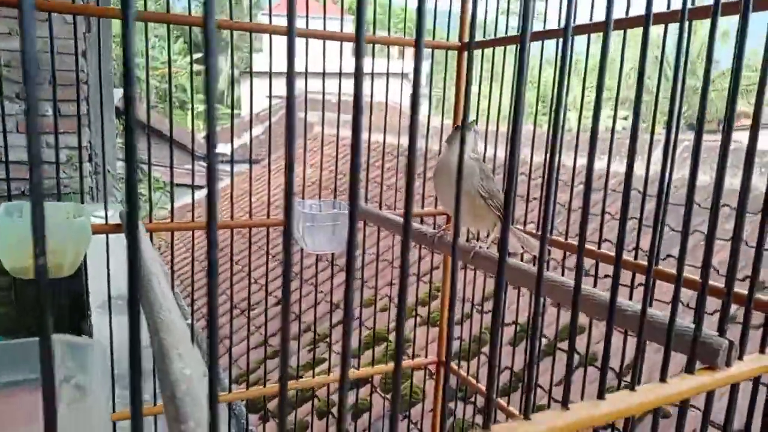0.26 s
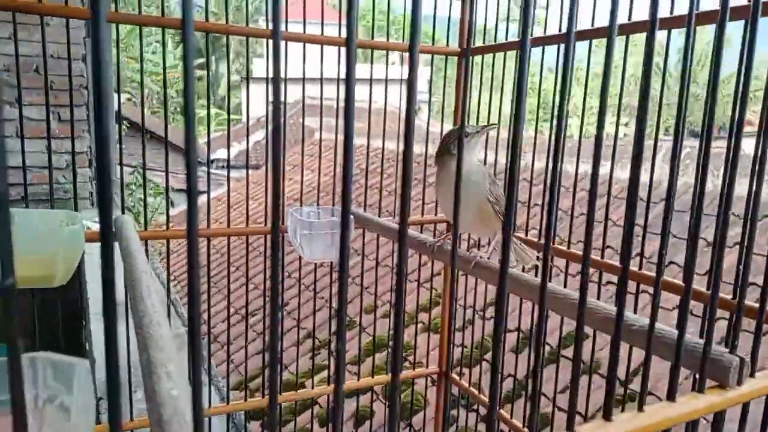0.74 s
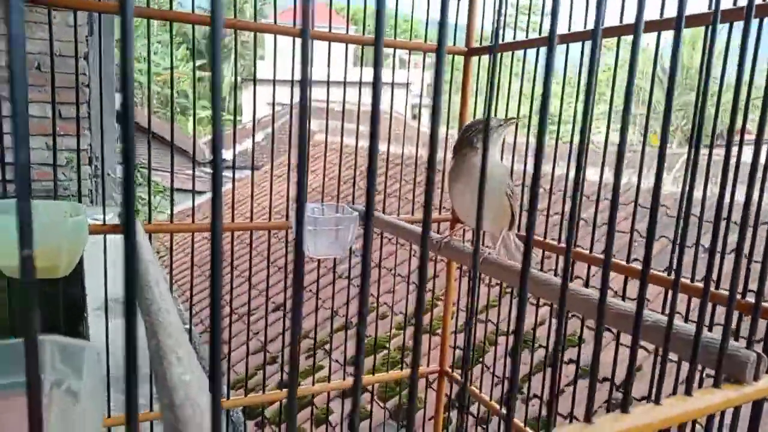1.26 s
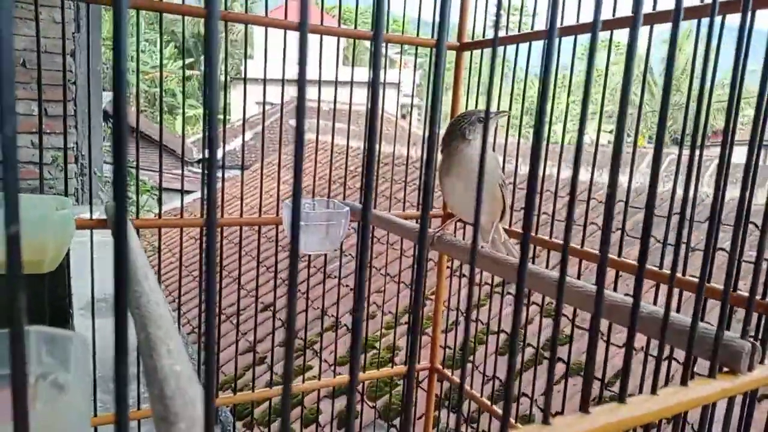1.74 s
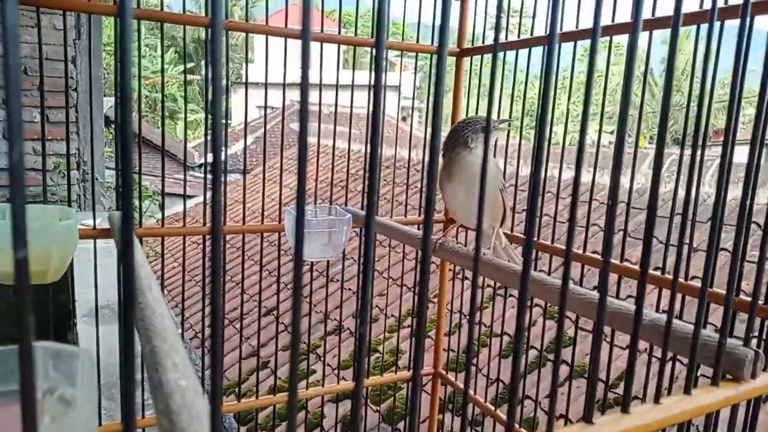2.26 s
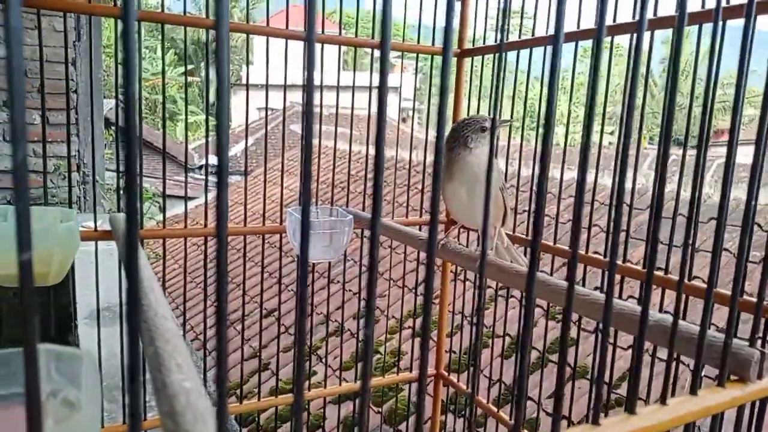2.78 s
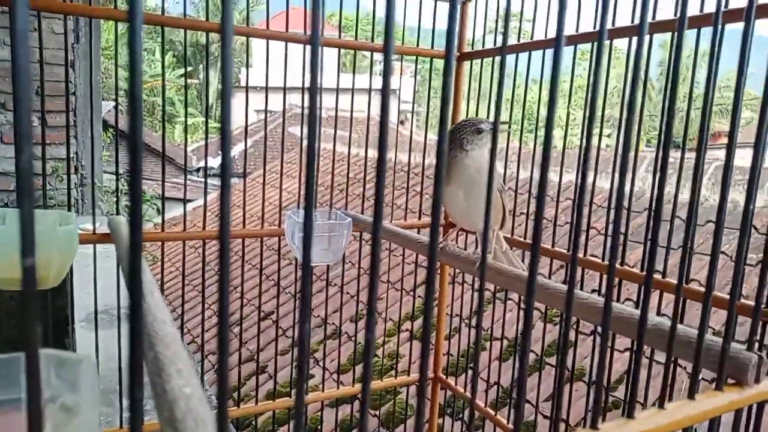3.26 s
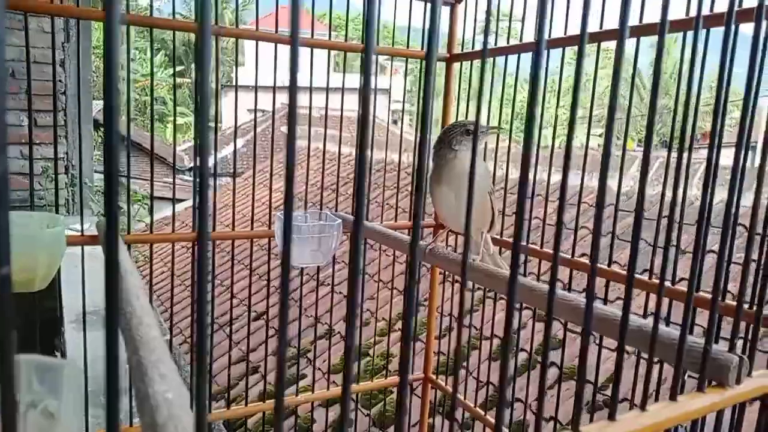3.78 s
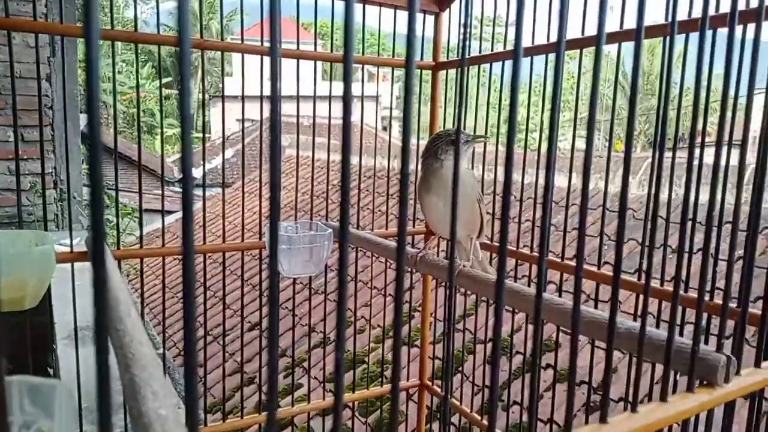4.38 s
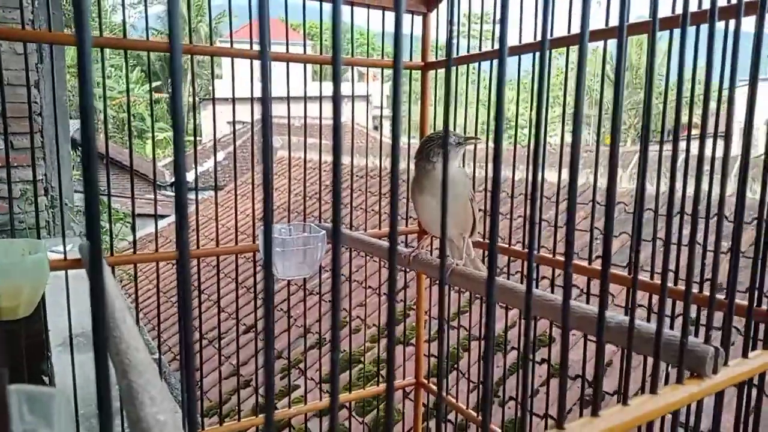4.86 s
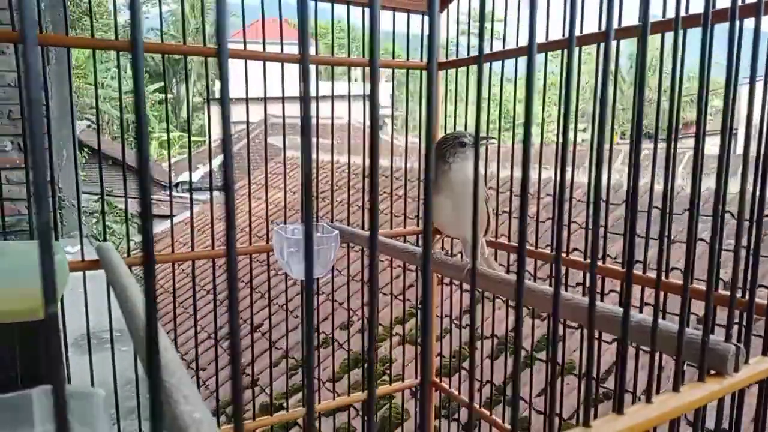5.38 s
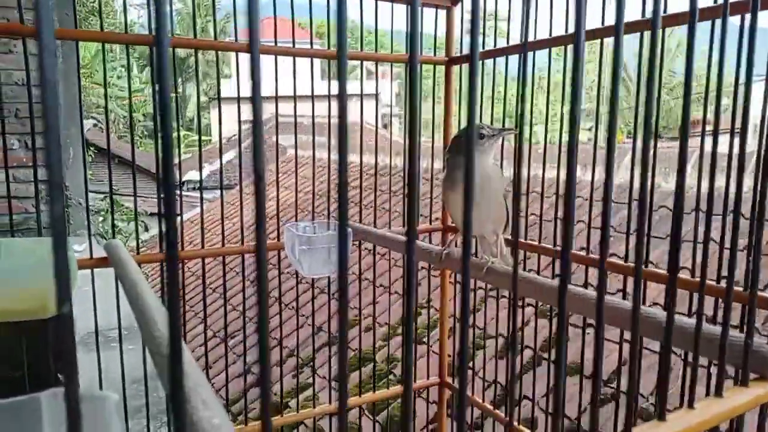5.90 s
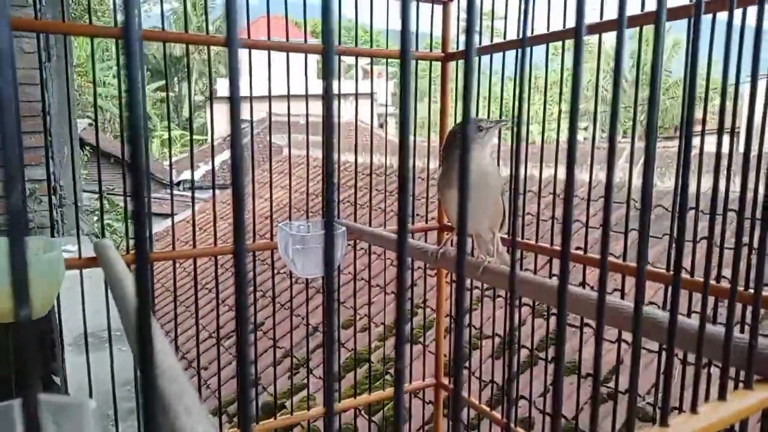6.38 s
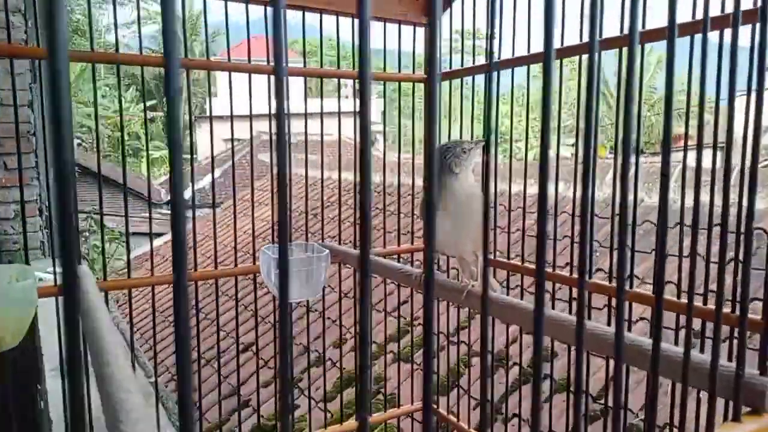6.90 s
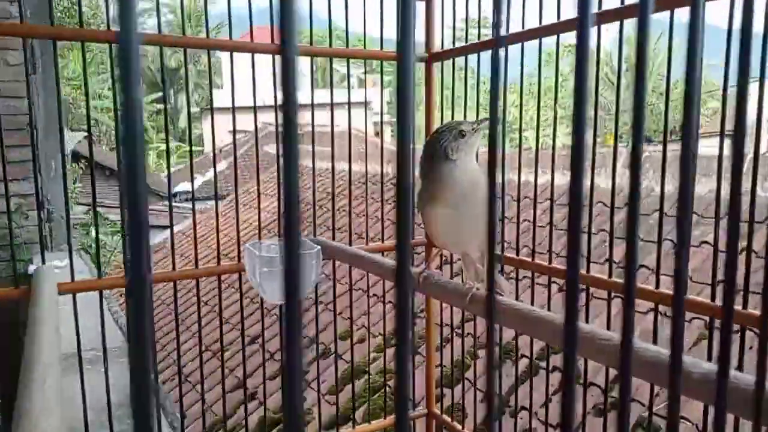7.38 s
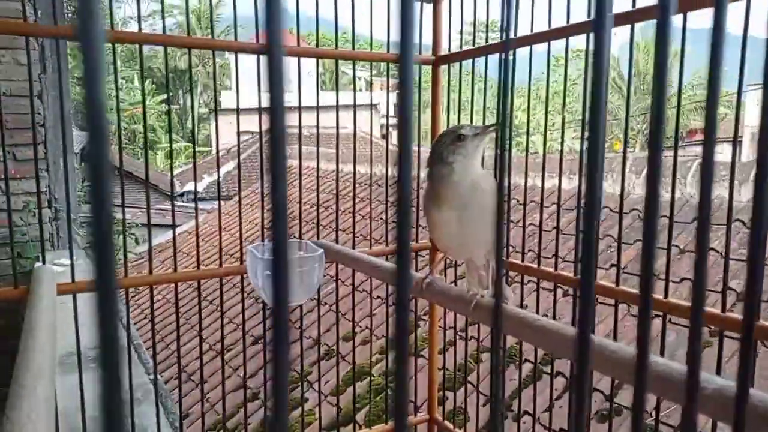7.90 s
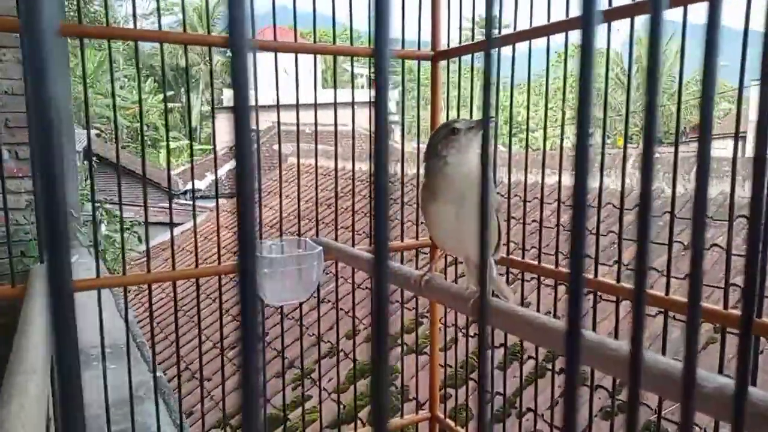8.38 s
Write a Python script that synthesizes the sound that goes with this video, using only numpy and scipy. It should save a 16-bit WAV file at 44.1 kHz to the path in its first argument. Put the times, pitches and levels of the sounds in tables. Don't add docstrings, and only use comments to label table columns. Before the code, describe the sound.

A small caged bird trills loudly and continuously close to the microphone, ten crisp falling whistles a second. The pitch sinks, jumps to a fuller high phrase midway, then gradually drops to deep-swooping notes, loudest near the end. Tiny claw ticks ring the bars around the middle. Behind lie faint engine drone, traffic wash, gusty rumble and hum, outdoors with short echoes off tiles and walls.

```python
import sys
import numpy as np
from scipy import signal
from scipy.fft import rfft, irfft
from scipy.io import wavfile

SR = 44100
rng = np.random.default_rng(int(sys.argv[2]) if len(sys.argv) > 2 else 0)


def level_to_linear(level):
    exponent = np.asarray(level, float) / 20
    return 10 ** exponent


def to_wav(sig):
    pcm = np.clip(np.atleast_2d(sig), -1, 1) * 32767
    pcm = np.round(pcm).astype(np.int16)
    wavfile.write(sys.argv[1], SR, pcm.T)


N = 381465
LEAD = SR // 10

# time in seconds, firing rate in Hz, level in dB.
LEAVING_ENGINE = [
    (0, 60, -36.5),
    (.8, 58.44, -36.5),
    (1.6, 57.97, -39.5),
    (2.4, 58, -63),
]


def at_hz(points, hz):
    points_hz, points_db = np.transpose(points)
    return np.interp(np.log(hz), np.log(points_hz), points_db)


def in_time(rows):
    s, *columns = np.transpose(rows)
    return [np.interp(np.arange(N) / SR, s, column) for column in columns]


def rms_one(x):
    return x / np.sqrt(np.mean(x ** 2) + 1e-20)


def band_pass(x, order, low_hz, high_hz):
    return signal.sosfilt(signal.butter(order, [low_hz, high_hz], "band", fs=SR, output="sos"), x)


def drift(rate):
    r = np.exp(-80 * np.pi * rate / SR)
    slow = signal.lfilter([1], [1, -2 * r, r * r], rng.standard_normal(N // 40 + 2002))[2000:]
    return np.interp(np.arange(N) / 40, np.arange(len(slow)), rms_one(slow))


def banded_noise(spectrum, low_hz, high_hz, patchy_db):
    out = 0
    together = drift(0.53)
    white = rng.standard_normal((2, N))
    edges = np.geomspace(low_hz, high_hz, 15)
    for k, (low, high) in enumerate(zip(edges, edges[1:])):
        band = band_pass(white[k % 2], 2, low, high)
        flicker_db = patchy_db * (.3 * together + drift(6))
        out = out + band * level_to_linear(at_hz(spectrum, np.sqrt(low * high)) + flicker_db)
    return rms_one(out)


def rumble():
    # frequency in Hz, density in dB per Hz.
    deep_spectrum = [(15, -54), (25, -27), (85, -1), (130, -18), (155, 12.5), (194, -0.5), (253, -30.5),
                     (358, -7), (454, -25), (552, -46), (700, -49), (910, -56), (1540, -120)]
    # centre in seconds, length in seconds, gain in dB.
    gusts = [
        (.5, 0.85, 4),
        (2.5, 1, 1.5),
        (3.9, 0.35, 4.5),
        (5.3, 0.37, 5.5),
        (6.665, 0.56, 2),
        (8.606, 0.41, 5.5),
    ]
    t = np.arange(N) / SR
    gust_db = sum(db * np.exp(-((t - s) / length_s) ** 2) for s, length_s, db in gusts)
    return level_to_linear(-42 + gust_db + 3 * drift(0.88)) * banded_noise(deep_spectrum, 26.2, 689.4, patchy_db=-2.0)


def traffic_wash():
    # frequency in Hz, density in dB per Hz.
    wash_spectrum = [(250, -9), (330, 2), (450, -5.5), (700, -7.5), (1100, -9.5), (2000, -6), (2500, -5),
                     (3300, -16), (4500, -35), (7300, -22), (8500, -27), (10000, -30), (12000, -46),
                     (17000, -42)]
    # time in seconds, level in dB.
    swell = [
        (0.0, -37),
        (0.6, -41),
        (2.0, -47),
        (3.4, -47.5),
        (4.2, -42),
        (5.3, -43),
        (6.3, -49),
        (7.4, -48.5),
        (8.65, -46.5),
    ]
    wash_db, = in_time(swell)
    return level_to_linear(wash_db + 1.0) * banded_noise(wash_spectrum, 276, 16660, patchy_db=2.74)


def engine(rows, orders, rough):
    hz, db = in_time(rows)
    phase = 2 * np.pi * np.cumsum(hz * (1 + rough * drift(2.09))) / SR
    sound = 0
    for k, level_db in orders:
        wavering = level_to_linear(level_db + 4.0 * drift(2.85))
        sound = sound + wavering * np.sin(round(k) * phase + rng.uniform(0, 2 * np.pi))
    t = np.arange(N) / SR
    passing = np.clip(np.minimum(t - rows[0][0], rows[-1][0] - t) * 8 + 1, 0, 1)
    return level_to_linear(db) * passing * rms_one(sound)


def far_engines():
    # time in seconds, firing rate in Hz, level in dB.
    slow_engine = [
        (0, 38.25, -54),
        (.5, 38.95, -40),
        (1.2, 38.27, -52),
        (1.9, 37.4, -51),
    ]
    passing_engine = [
        (3.3, 30.87, -53),
        (3.6, 30.59, -37),
        (4.5, 31.4, -42.5),
        (5.4, 31.74, -35),
        (5.75, 32.07, -44),
        (7.2, 33.5, -51),
        (7.6, 33.44, -49.5),
    ]
    # multiple of the firing rate, level in dB.
    leaving_orders = [(1, -29), (2, -0.5), (3, -0.5), (4, -7), (5, -6.5), (6, -3), (7, -21.5), (8, -13),
                      (9, -16), (11, -15), (13, -20.5), (15, -21)]
    slow_orders = [(2, 4.5), (4, -10), (8, 4), (9, -15), (11, -31), (12, -12)]
    passing_orders = [(2, -9.5), (4, 5), (5, -15), (6, 2.5), (7, -18.5), (8, -3.5), (9, -10), (10, -8.5),
                      (11, -7.5), (15, -25.5), (30, -15.5)]
    leaving = engine(LEAVING_ENGINE, leaving_orders, rough=0.0027)
    slow = engine(slow_engine, slow_orders, rough=0.0017)
    return leaving + slow + engine(passing_engine, passing_orders, rough=0.0031)


def tyres():
    # frequency in Hz, width in Hz, level in dB.
    tyre_modes = [
        (1541, 51, -50),
        (2092, 89, -45.5),
        (1863, 31, -52),
    ]
    out = 0
    fade_db = in_time(LEAVING_ENGINE)[1] - LEAVING_ENGINE[0][2]
    for hz, width_hz, db in tyre_modes:
        b, a = signal.iirpeak(hz, hz / width_hz, fs=SR)
        whine = rms_one(signal.lfilter(b, a, rng.standard_normal(N)))
        out = out + level_to_linear(db + 1.6 * fade_db) * whine
    return out


def hum():
    beating_db = 4.5 * np.tanh(drift(4))
    hz = 147.7 * (1 + 0.014 * drift(10.5))
    return level_to_linear(-45.5 + beating_db) * np.sin(2 * np.pi * np.cumsum(hz) / SR)


def whistles(calls):
    out = np.zeros(N)
    for s, length_s, from_hz, to_hz, db in calls:
        along = np.linspace(0, 1, round(length_s * SR))
        phase = 2 * np.pi * np.cumsum(from_hz + (to_hz - from_hz) * along) / SR
        swell = np.sqrt(np.abs(np.sin(np.pi * along)))
        out[round(s * SR):][:len(along)] += level_to_linear(db) * swell * np.sin(phase)
    return out


def insect():
    # start in seconds, length in seconds, from Hz, to Hz, level in dB.
    whines = [
        (.4, .09, 14400, 15500, -66),
        (.46, .08, 14800, 14100, -68),
        (.5, .105, 15500, 14700, -59),
        (.605, .05, 14700, 15600, -58),
        (.655, 0.034, 15760, 14600, -62),
        (.75, .055, 15000, 14550, -61),
        (.805, .04, 14550, 15400, -64),
        (1.165, .03, 15500, 14400, -64),
        (1.205, .012, 15400, 14400, -66),
    ]
    return whistles(whines)


def far_birds():
    # start in seconds, length in seconds, from Hz, to Hz, level in dB.
    pipes = [
        (2.89, 0.064, 3450, 3500, -36),
        (3.03, 0.037, 3450, 3530, -44),
        (6.78, 0.065, 2750, 2780, -45),
        (6.96, .16, 2800, 2680, -39),
        (7.28, 0.174, 2810, 2700, -49),
        (7.55, 0.065, 2740, 2780, -45),
    ]
    return whistles(pipes) * level_to_linear(3.8 * drift(30.4))


def ticks():
    # frequency in Hz, decay time T60 in seconds.
    bar_modes = [(920, .05), (1180, .04), (1310, .05), (1670, .06), (1920, .05), (2100, .05), (2420, .045),
                 (2580, .045)]
    # time in seconds, ring in dB, struck near Hz, rattle in dB, top of the rattle in dB.
    touches = [(3.2936, -25.5, 1670, -26, 0), (3.294, -30, 920, -60, -9), (3.298, -48, 1326, -43, -4),
               (3.307, -27.5, 2500, -31, -3), (3.602, -33, 2580, -60, -9), (3.609, -34, 1250, -60, -7),
               (3.626, -31, 1310, -60, -9), (3.639, -35.5, 1310, -58, -9), (3.65, -35, 1430, -54, -11),
               (3.663, -36, 1310, -58, -17), (3.699, -37, 1250, -57, -7), (4.81, -29.5, 1770, -29, -2),
               (4.81, -48, 920, -61, -9), (4.815, -29, 2360, -40, -12), (4.822, -47, 1717, -44, -12)]
    out = np.zeros(LEAD + N)
    t = np.arange(SR // 5) / SR
    air = signal.butter(4, 12500, "high", fs=SR, output="sos")
    for s, ring_db, near_hz, rattle_db, top_db in touches:
        noise = rng.standard_normal(len(t))
        ring = 0
        for hz, t60 in bar_modes:
            mistuning_db = -22 * abs(np.log2(hz / near_hz))
            ring = ring + level_to_linear(mistuning_db - 60 * t / t60) * np.sin(2 * np.pi * hz * t)
        rattle = rms_one(band_pass(noise, 2, 5000, 10000))
        rattle += level_to_linear(top_db) * rms_one(signal.sosfilt(air, noise))
        crack = rms_one(band_pass(noise, 1, 0.7 * near_hz, 3.1 * near_hz))
        touch = level_to_linear(ring_db - 5.5) * ring
        touch += level_to_linear(ring_db - 11.5 - 60 * t / 0.042) * crack
        touch += level_to_linear(rattle_db - 11.5 - 60 * t / 0.066) * rattle
        at = LEAD + round(s * SR)
        out[at:at + len(t)] += touch
    return out


def note(rest_hz, glide_ms, length_ms, peak_db, start_db):
    # pitch in Hz, level in dB.
    throat = [(1800, -30), (2400, -13), (2900, -7), (3300, 0), (4200, -2), (4900, -11), (5600, -5.5),
              (6800, -5), (7600, -17.5), (8300, -35.5)]
    # frequency in Hz, level in dB.
    beak = [(7600, -53), (8800, -55), (10000, -27.5), (11200, -44), (13000, -43), (15000, -33),
            (17000, -44)]
    ms = np.arange(-4 * SR // 1000, 70 * SR // 1000) * 1000 / SR
    after = np.maximum(ms - length_ms, 0)
    slack = np.clip((3400 - rest_hz) / 1000, 0, 1)
    hz = rest_hz + (7000 - rest_hz) * np.exp(-ms / glide_ms) - 170 * slack * after
    hz = np.maximum(hz, 1500)
    phase = 2 * np.pi * np.cumsum(hz) / SR
    opening = 1 / (1 + np.exp(-(ms + 1.58) / 2.26))
    closing = level_to_linear(-5.0) * np.exp(-(after / 4.35) ** 2)
    closing += (1 - level_to_linear(-5.5)) * np.exp(-(after / .6) ** 2)
    bright_db = (start_db + 8.5) * np.clip((hz - 4500) / 1200, 0, 1)
    tone = level_to_linear(at_hz(throat, hz) + bright_db) * np.sin(phase)
    overtones = np.zeros(len(ms))
    for k, db in enumerate([.1, -7, -10], 2):
        overtones += level_to_linear(db + at_hz(beak, k * hz)) * np.sin(k * phase) * (k * hz < 17000)
    turbulence = rms_one(signal.lfilter([1], [1, -1.7, .7225], rng.standard_normal(len(ms))))
    overtones *= .6 + .8 * turbulence
    overtones *= level_to_linear(0.93 * (start_db + 10))
    low_hz = 3300 + 1100 * np.exp(-(ms + 3) / 2.2)
    chirp = np.sin(2 * np.pi * np.cumsum(low_hz) / SR) * np.exp(-((ms + .2) / 2.3) ** 2)
    return level_to_linear(peak_db - 2.5) * (opening * closing * (tone + overtones) + level_to_linear(-19.0) * chirp)


def trill():
    # time the first whistle passes 7 kHz in seconds, notes, gap in ms.
    bursts = [(0.0478, 3, 95.3), (0.3338, 3, 101.6), (0.6317, 4, 100.3), (1.0322, 3, 104.5),
              (1.3505, 6, 104.6), (1.9935, 4, 102.8), (2.4071, 3, 110.2), (2.7324, 3, 114.1),
              (3.0695, 4, 104.2), (3.4752, 3, 99.3), (3.7688, 3, 102.2), (4.0791, 7, 108.0),
              (4.8357, 7, 99.1), (5.5338, 4, 97.2), (5.9206, 6, 99.7), (6.513, 10, 98.5), (7.5016, 3, 97.2),
              (7.7898, 9, 100.0)]
    # time in seconds, pitch the notes sink toward in Hz,
    # effort as peak level in dB, beak opening as level of the high start in dB.
    singer = [(0.05, 3064, -5.5, -7.5), (.63, 2156, -7, -6), (1.1, 1814, -9.5, -6.5), (1.5, 1966, -8, -9),
              (1.95, 2400, -10.5, -9), (2.25, 1960, -10.5, -8), (2.45, 2510, -9, -8.5),
              (3.4, 2375, -7.5, -9), (3.67, 3707, -7.5, -10), (4.4, 3668, -6.5, -13), (5.0, 3630, -6, -8.5),
              (5.3, 2944, -7, -6.5), (5.9, 2685, -8, -6), (6.3, 2170, -7.5, -10.5), (6.9, 1776, -9, -6),
              (7.4, 2200, -6.5, -9.5), (7.95, 1570, -4, -10), (8.6, 1740, -5, -7)]
    s = np.concatenate([start + np.arange(round(count)) * gap_ms / 1000 for start, count, gap_ms in bursts])
    s = np.append(s, 2 * s[0] - s[1])
    when, *columns = np.transpose(singer)
    rest_hz, peak_db, start_db = [np.interp(s, when, column) for column in columns]
    chance = rng.standard_normal((4, len(s)))
    khz_up = (rest_hz - 2400) / 1000
    glide_ms = 11.83 - 2.185 * khz_up + .4 * chance[0]
    held = np.clip((s - 3.62) / .2, 0, 1) * (s < 4.78)
    length_ms = 19.39 + 3.3 * khz_up + 11.4 * held + .7 * chance[1]
    peak_db = peak_db + .5 * chance[2]
    start_db = start_db + chance[3]
    out = np.zeros(LEAD + N + SR)
    for at_s, *shape in zip(s, rest_hz, glide_ms, length_ms, peak_db, start_db):
        sound = note(*shape)
        at = LEAD + round((at_s - .004) * SR)
        out[at:at + len(sound)] += sound
    return out[:LEAD + N]


def rooftop(x):
    # delay in ms, level in dB, sign of the reflection.
    echoes = [(0.396, -16.4, -1), (0.88, -21.4, 1), (1.416, -17.3, -1), (2.508, -21.3, -1),
              (2.992, -21.4, -1), (4.476, -24.6, -1), (4.928, -17.4, -1), (5.74, -20.6, -1),
              (7.388, -24.9, -1), (7.8, -15.5, 1), (8.272, -24.0, 1), (12.536, -24.7, 1),
              (14.596, -24.9, -1), (15.348, -23.5, 1)]
    # decay time T60 in seconds, level in dB, farthest wall in seconds.
    yard = [
        (.08, -4.5, 0.16),
        (.28, -9, 0.063),
        (.55, -22, .5),
    ]
    # frequency in Hz, level in dB.
    sideways = [(500, 2.5), (2250, 12), (2750, 14.5), (3200, -0.5), (3800, -1.65), (5000, -2.5), (6000, -2),
                (7200, 6), (8500, 6), (10000, 1), (16000, -17)]
    near = np.zeros(SR // 25)
    near[0] = 1
    for ms, level_db, sign in echoes:
        near[round(ms * SR / 1000)] += sign * level_to_linear(level_db + 3.5)
    out = signal.fftconvolve(x, near)[:len(x)]
    t = np.arange(SR // 2) / SR
    turn = np.arange(len(x)) / SR * 0.45
    colour = level_to_linear(at_hz(sideways, np.arange(1, len(t) // 2 + 2) * SR / len(t)))
    for posture in range(5):
        tail = 0
        for t60, db, wall_s in yard:
            shape = level_to_linear(-60 * t / t60) * np.clip((wall_s - t) / .025, 0, 1)
            tail = tail + level_to_linear(db) * rms_one(rng.standard_normal(len(t)) * shape) / np.sqrt(len(t))
        tail = irfft(rfft(tail * np.clip(t / 0.0025, 0, 1)) * colour, len(t))
        share = np.cos(np.pi / 2 * np.clip(turn - posture, -1, 1))
        out += signal.fftconvolve(x * share, tail)[:len(x)]
    return out[LEAD:]


def scene():
    far = rumble() + traffic_wash() + far_engines() + tyres() + hum()
    high = insect() + far_birds()
    return (far + high + rooftop(trill() + ticks()))[None]


def top_cut(x):
    return signal.sosfilt(signal.butter(12, 16110, fs=SR, output="sos"), x)


def record(dry):
    hiss = level_to_linear(-70) * rms_one(np.diff(rng.standard_normal(N + 1)))
    thin = signal.sosfilt(signal.butter(2, 45, "high", fs=SR, output="sos"), dry + hiss)
    limited = 1.8 * np.tanh(thin / 1.8)
    cut = signal.sosfilt(signal.cheby2(14, 50, 15900, fs=SR, output="sos"), limited)
    return top_cut(cut)


dry = scene()
out = record(dry)
to_wav(out)
```